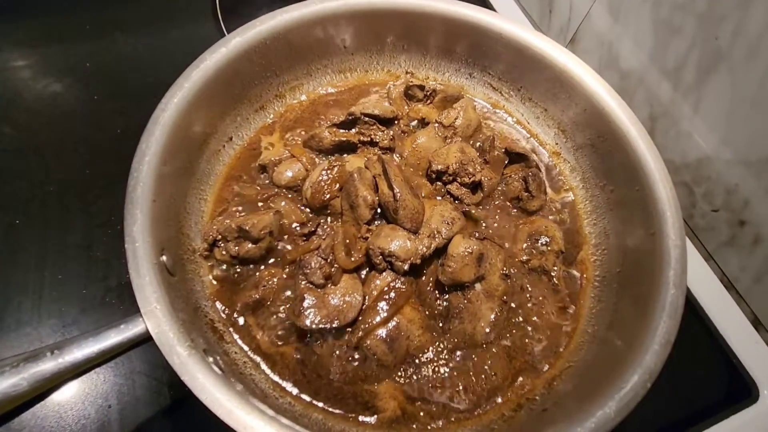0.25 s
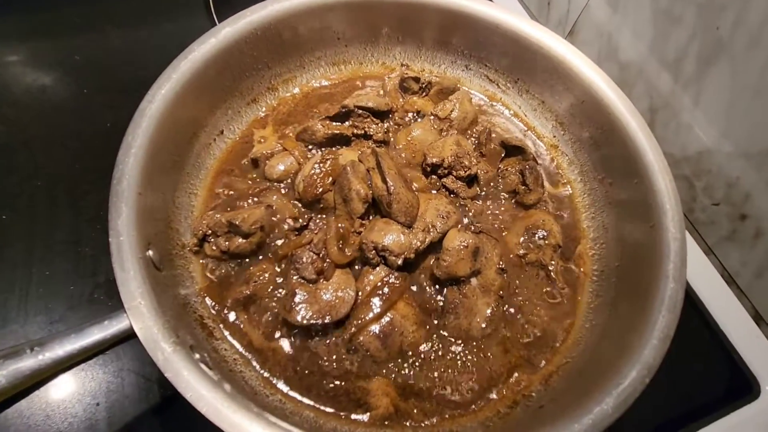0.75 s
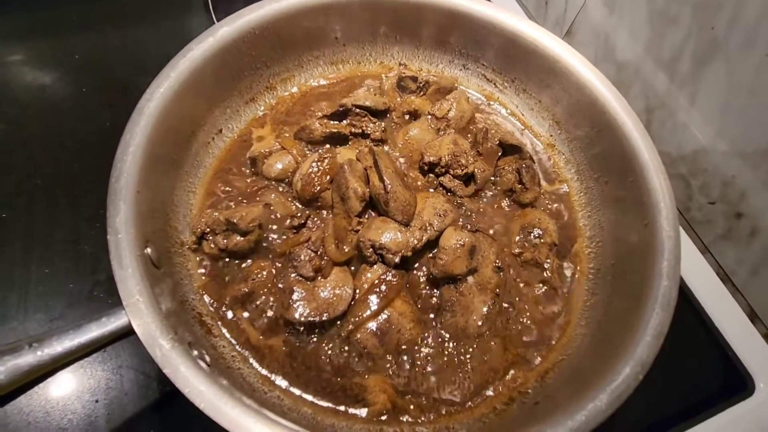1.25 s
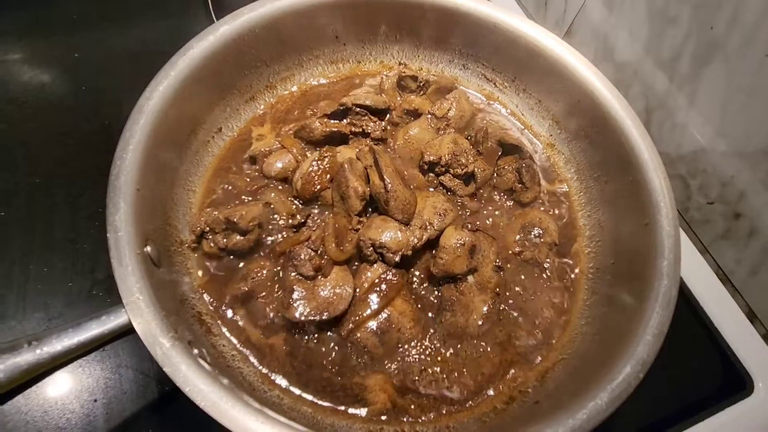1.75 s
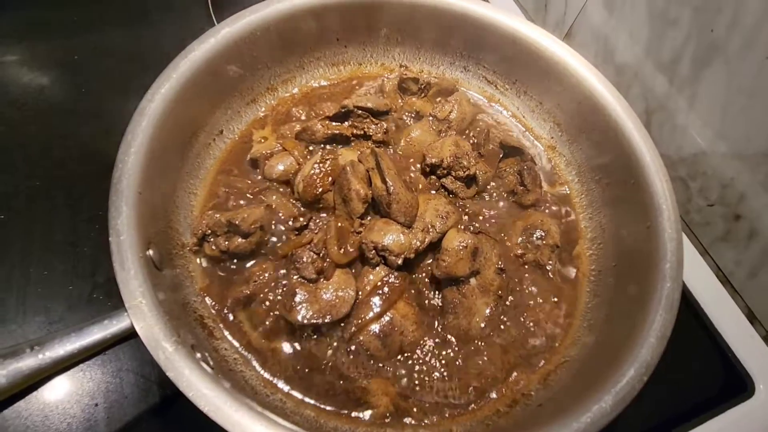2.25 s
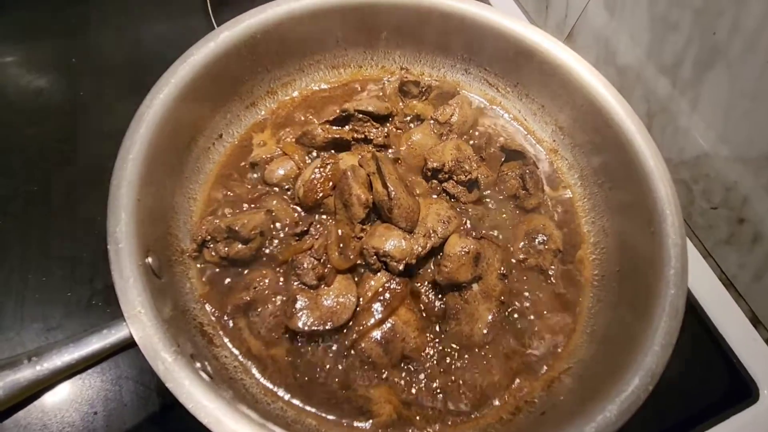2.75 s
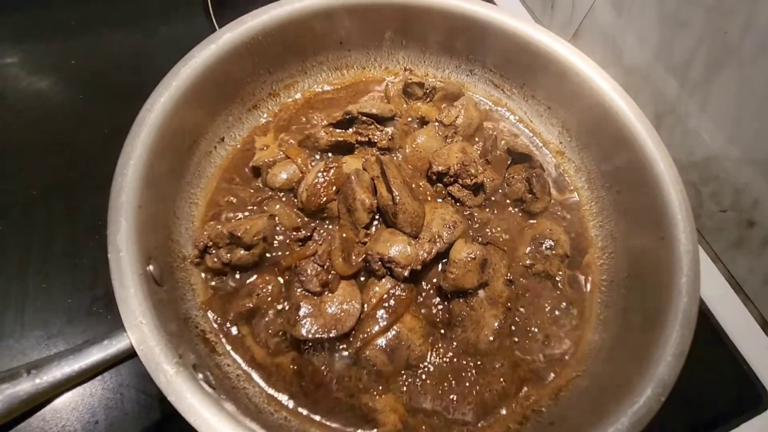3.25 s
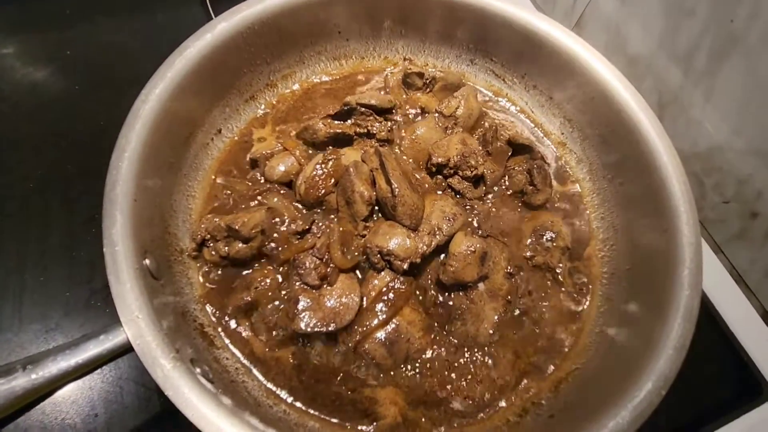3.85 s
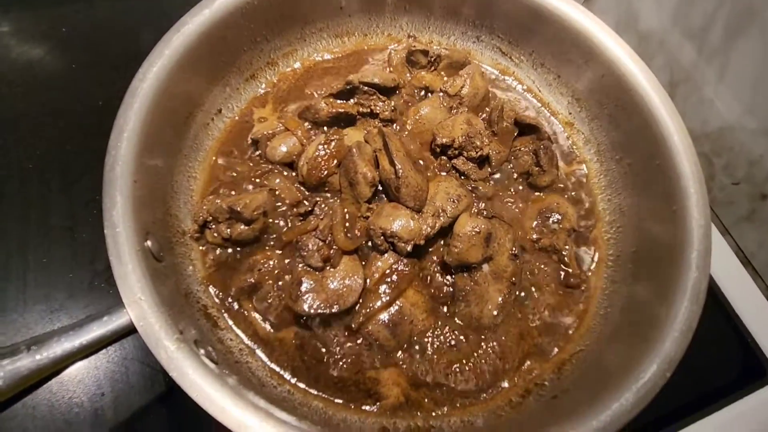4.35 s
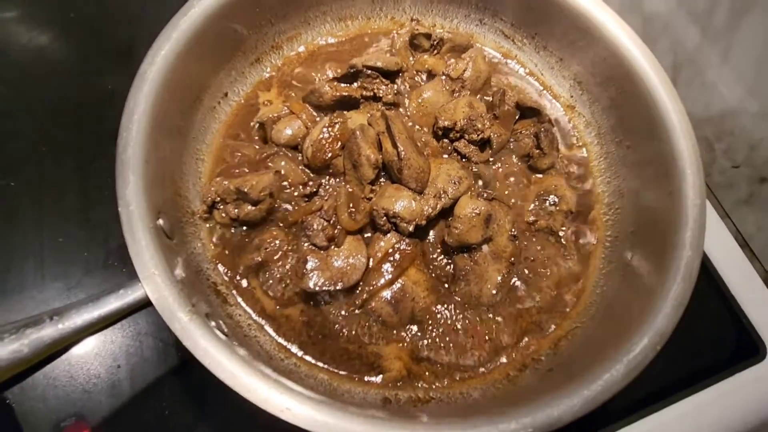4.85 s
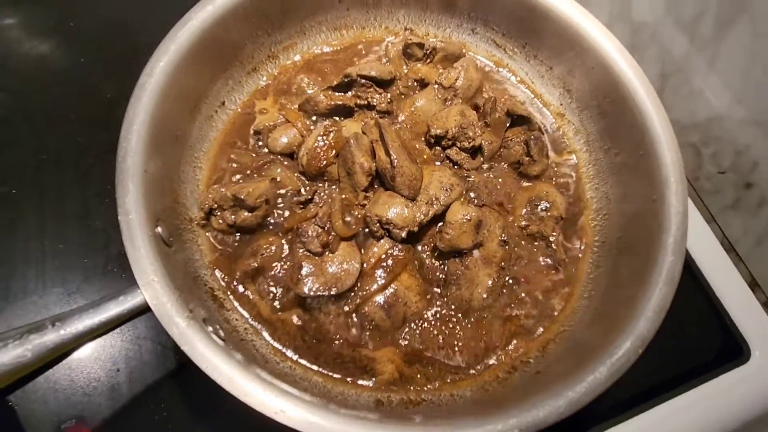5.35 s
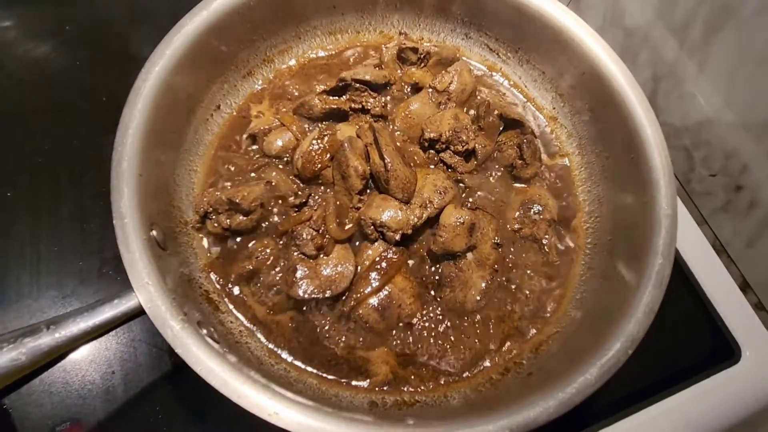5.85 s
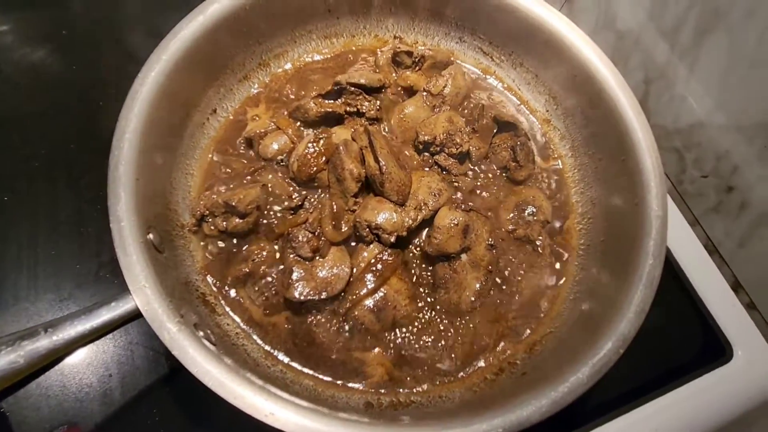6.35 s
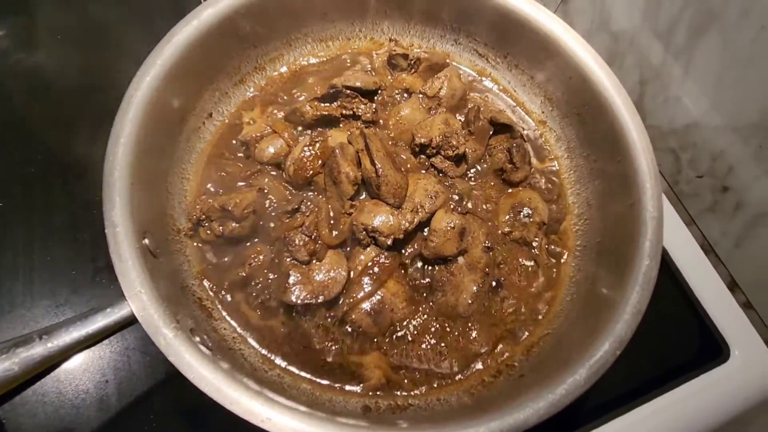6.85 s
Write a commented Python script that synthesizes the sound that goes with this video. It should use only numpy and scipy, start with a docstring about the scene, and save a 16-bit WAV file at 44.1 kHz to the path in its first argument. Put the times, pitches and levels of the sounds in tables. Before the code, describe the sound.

Close stereo sound of a simmering pan: dense, crisp, crackly fizz with a few small bright pops, over the constant low drone and airflow of a cooker hood. After a slight early puff, a sudden draught knocks against the left microphone with dull rapid thumps and rumble, dies away in stages, and leaves the steady simmer and hum, with faint gusts late on.

```python
"""Meat simmers in its sauce in a steel pan on a glass hob, under a running extractor hood.
From the start the hood hums on steady tones over the rush of air, made of shaped noise, while tiny
bubbles fizz as short puffs of noise. Larger bubbles pop now and then as brief rings, the first after 0.3 s.
After a short gust at 0.5 s, a draught buffets the left microphone port from 2.6 s: a run of low knocks
over rumbling noise that dies down to a flutter. Two weaker gusts and two pops come near the end."""
import sys
import numpy as np
from scipy import signal
from scipy.fft import rfft, irfft, next_fast_len
from scipy.io import wavfile

SR = 44100
rng = np.random.default_rng(int(sys.argv[2]) if len(sys.argv) > 2 else 0)


def digitize_waveform(pressure):
    """Quantize a signal to 16-bit integers and store it at the path in sys.argv[1].

    Rows of a 2-D input are taken as channels; values are limited to [-1, 1].
    """
    field = np.atleast_2d(pressure).T
    bounded = np.clip(field, -1, 1)
    quanta = np.round(bounded * 32767).astype(np.int16)
    wavfile.write(sys.argv[1], SR, quanta)


N = 313549  # length of the sound in samples

# bubbles by size, the smallest fizz highest:
# (lowest pitch [Hz], highest pitch [Hz], typical bursts [per s], typical rise above the weakest burst [dB])
BUBBLE_SIZES = [(1500, 5730, 2200, 3.5), (6020, 10100, 2200, 5), (9100, 19000, 1100, 4.5)]
# fizz of the sauce as the pan colours it, before it is split by bubble size:
# (frequency [Hz], left level [dB per Hz], right level [dB per Hz])
FIZZ_COLOUR = [(1500, -76, -78.5), (3430, -88, -81.5), (4340, -84, -73.5), (5500, -81.5, -76.5),
               (6860, -82, -75), (7370, -83.5, -72.5), (8470, -86.5, -76), (9170, -86, -86),
               (9900, -94, -92), (11000, -92, -94), (11900, -87, -84), (12900, -88, -88), (13900, -94, -90),
               (15200, -88, -90)]
# how alike the fizz is in the two ears: (frequency [Hz], likeness [0-1])
FIZZ_ALIKE = [(1500, 0.11), (7000, 0.01), (8000, 0.8), (15000, 1)]
# larger bubbles bursting; pops() shifts all their levels together:
# (time [s], relative level [dB], pitch [Hz], left minus right [dB])
LARGE_BUBBLES = [(.3346, -26, 7450, -10), (.5616, -34, 4500, -5), (1.2795, -24, 7350, -9),
                 (2.5895, -31, 3340, -6), (3.7105, -29, 4300, -3), (4.1335, -36, 4600, -6),
                 (6.349, -24, 8510, -10), (7.0244, -23, 7690, -6)]
# gusts of the draught at the microphone: (start [s], length of the hold [s], level before it sags [dB])
DRAUGHT_GUSTS = [(0.538, 0.11, -26), (2.597, 0.35, -10), (3.06, 0.58, -14), (3.685, 0.43, -20.5),
                 (4.43, .05, -31), (4.78, 0.47, -33), (6.363, 0.43, -27), (6.994, 0.11, -28)]
# the strongest eddies knocking on the left port, before the port filters them:
# (time [s], thump level [dB], edge level [dB], pitch of the edge [Hz])
EDDY_KNOCKS = [(2.615, 2, -10, 480), (2.632, -2, -17, 480), (2.666, -1, -12, 520), (2.722, -1, -12, 560),
               (2.760, -2, -13, 420), (2.797, 0, -13, 400), (2.829, -6, -16, 470), (2.877, -4, -26, 380),
               (2.918, -9, -26, 350), (2.952, -5, -18, 380), (3.123, -13, -14, 380), (3.161, -5, -16, 520),
               (3.347, -12, -17, 480), (3.414, -9, -10.5, 560)]
# motor and fan tones, close pairs beat: (frequency [Hz], average level [dB], left minus right [dB])
HOOD_TONES = [(94.56, -33.5, 0), (120.02, -22.2, .3), (127.3, -30.4, .6), (152.8, -42, .5),
              (214.58, -28.6, -1.1), (254.62, -25.3, -1.2), (265.5, -35.7, 1.1)]
# low roar of the fan, alike in both ears: (frequency [Hz], level [dB per Hz])
FAN_ROAR = [(25, -72), (45, -81), (62, -55.5), (78, -52.5), (105, -56), (150, -51.5), (195, -48),
            (235, -54.5), (285, -51.5), (330, -57), (390, -60.5), (440, -74.5), (560, -92)]
# air through the filter and duct, arriving from all sides:
# (frequency [Hz], left level [dB per Hz], right level [dB per Hz])
AIR_RUSH = [(70, -91, -95), (201, -65, -57), (320, -65, -67), (430, -70, -67), (507, -62.5, -63),
            (630, -73, -72.5), (706, -62, -67.5), (970, -67, -69.5), (1085, -65, -69), (1160, -71.5, -67.5),
            (1365, -64, -66.5), (1730, -74, -70), (1830, -72.5, -65), (2190, -68.5, -74),
            (2400, -77.5, -73.5), (3200, -74, -74), (4740, -86.5, -80.5), (9000, -108, -98.5)]
# narrow resonances of the duct, rung by the passing air:
# (frequency [Hz], width [Hz], left level [dB], right level [dB])
DUCT_RESONANCES = [(377.6, 29, -46.5, -41), (479.4, 14, -60, -50), (524.5, 27, -52, -49.5),
                   (752, 22, -46.5, -52), (1358, 36, -51, -55), (1844, 37, -79, -48)]

# every gust rises quickly, sags while it blows, then collapses into the faint stir of the room
GUST_ATTACK_S, GUST_SAG_DB_PER_S, GUST_RELEASE_DB_PER_S, STIR_DB = .012, 5.5, 198, -65
CUTOFF_HZ = 15800
LEFT_ONLY = np.array([[1], [0]])


def fizz(burst_s=0.00068, clump_db=1.0, own_clump_db=1.45, hiss_share=0.3, broad_share=0.47):
    """Tiny bubbles burst in clumps, each a very short puff of noise, over a smooth hiss of steam."""
    shared_clumps_db = clump_db * drift(25)
    bins_hz = np.fft.rfftfreq(next_fast_len(N), 1 / SR)
    colour = from_db(over_frequency(FIZZ_COLOUR))
    alike = np.clip(over_frequency(FIZZ_ALIKE), 0, 1)
    # some bursts are sharp enough to fill every band at once
    broad = burst_power(per_s=1200, size_db=2.5, burst_s=burst_s)
    same = different = 0
    for low_hz, high_hz, per_s, size_db in BUBBLE_SIZES:
        # the number of bursts swells and thins out, partly in step for all sizes
        clumps_db = shared_clumps_db + own_clump_db * drift(25)
        own = burst_power(per_s * from_db(2 * clumps_db), size_db, burst_s)
        bursts = rms_one(np.sqrt(own + broad_share * broad + hiss_share))
        low_edge = 1 + (low_hz / (bins_hz + 1)) ** 16
        high_edge = 1 + (bins_hz / high_hz) ** 16
        gains = colour / np.sqrt(low_edge * high_edge)
        # the lower fizz differs between the ears; most of the top is the same in both
        same = same + filtered(bursts * white(), gains * np.sqrt(alike))
        two_noises = np.array([white(), white()])
        different = different + filtered(bursts * two_noises, gains * np.sqrt(1 - alike))
    return same + hob_corner(different, echo_gain=0.13)


def pops(cycles=7, gain_db=-2):
    """A larger bubble rings for a few cycles as its skin breaks."""
    out = np.zeros((2, N))
    t = np.arange(SR // 100) / SR
    for time_s, level_db, hz, pan_db in LARGE_BUBBLES:
        at = round(time_s * SR)
        ring = np.sin(2 * np.pi * hz * t) * np.exp(-hz * t / cycles)
        out[:, at:at + len(t)] += from_db(level_db + gain_db) * panned(pan_db) * ring
    return out


def knocks(body_hz=140):
    """A single eddy pushes and pulls once on the left port: a dull thump with a sharper edge."""
    t = np.arange(-SR // 50, SR // 50) / SR
    pressure = np.zeros(N)
    for time_s, thump_db, edge_db, edge_hz in EDDY_KNOCKS:
        thump = push_and_pull(t, body_hz)
        edge = push_and_pull(t, edge_hz)
        at = round(time_s * SR) - len(t) // 2
        pressure[at:at + len(t)] += from_db(thump_db) * thump + from_db(edge_db) * edge
    # the port lets little of the slowest part through
    return LEFT_ONLY * band(pressure, 80, 1500)


def push_and_pull(t, hz):
    """One swing of pressure up and down, peaking at 1; a higher pitch makes it shorter."""
    u = 2 * np.pi * hz * t
    return -u * np.exp((1 - u * u) / 2)


def draught(rumble_db=-3, churn_db=-3, rasp_db=-16.0, full_db=-11, flutter_db=-17, flutter_pan_db=4,
            flutter_growth=-0.71, churn_growth=0.86, rasp_growth=1.6, lumpy_db=3):
    """Turbulence at the left port: stronger air sheds smaller, higher eddies; slow flutter moves both ports."""
    level_db = gust_level()
    force_db = level_db - full_db
    lumps = from_db(lumpy_db * drift(45))
    # each growth is the extra dB of a layer for each dB of force
    flutter = from_db(flutter_db + flutter_growth * force_db) * rms_one(band(white(), 42, 90))
    rumble = from_db(rumble_db) * rms_one(band(white(), 73, 144.5))
    churn = from_db(churn_db + churn_growth * force_db) * rms_one(band(white(), 132, 294, order=3))
    rasp_noise = rms_one(band(lumps * white(), 260, 640, order=3))
    rasp = from_db(rasp_db + rasp_growth * force_db) * rasp_noise
    both_ports = panned(flutter_pan_db) * flutter
    return from_db(level_db) * (both_ports + LEFT_ONLY * (rumble + churn + rasp))


def gust_level():
    """Strength of the draught in dB: each gust has an attack, a sagging hold and a release."""
    t = np.arange(N) / SR
    strength = from_db(STIR_DB)
    for start_s, length_s, level_db in DRAUGHT_GUSTS:
        age = np.maximum(t - start_s, 0)
        fall_db = GUST_SAG_DB_PER_S * age + GUST_RELEASE_DB_PER_S * np.maximum(age - length_s, 0)
        attack = np.minimum(age / GUST_ATTACK_S, 1)
        strength = strength + attack * from_db(level_db - fall_db)
    return 20 * np.log10(strength)


def hum(waver_db=.5, wander_rad=0.057):
    """Steady tones of motor and blades; the uneven airflow sways each a little in level and phase."""
    t, out = np.arange(N) / SR, 0
    for hz, level_db, pan_db in HOOD_TONES:
        phase = 2 * np.pi * (hz * t + rng.random()) + wander_rad * drift(0.62)
        tone = np.sqrt(2) * np.sin(phase)
        out = out + tone * from_db(level_db + waver_db * drift(1.7)) * panned(pan_db)
    return out


def airflow():
    """Long waves of the roar reach both ears as one; the duct's rush reaches each by its own paths."""
    roar = filtered(white(), from_db(over_frequency(FAN_ROAR)))
    rush = filtered(np.array([white(), white()]), from_db(over_frequency(AIR_RUSH)))
    duct = 0
    for hz, width_hz, left_db, right_db in DUCT_RESONANCES:
        ringing = rms_one(resonance(white(), hz, width_hz))
        duct = duct + from_db([[left_db], [right_db]]) * ringing
    return roar + hob_corner(rush) + duct


def hob_corner(x, echo_gain=.17, count=8):
    """Hob, wall and hood return early echoes, at other delays for each ear, which ripple the spectrum."""
    out = x.copy()
    delays = (rng.uniform(.002, .016, (2, count)) * SR).astype(int)  # drawn in s, turned into samples
    for ear, lags in enumerate(delays):
        for lag in lags:
            out[ear, lag:] += echo_gain * x[ear, :-lag]
    # keep the overall strength about the same
    return out / np.sqrt(1 + count * echo_gain ** 2)


def burst_power(per_s, size_db, burst_s):
    """Power of bubbles that burst at random, each dying away at once; mean 1."""
    born = rng.random(N) < per_s / SR
    sizes = from_db(size_db * np.minimum(rng.exponential(1, N), 5))
    power = signal.lfilter([1], [1, -np.exp(-1 / (burst_s * SR))], born * sizes ** 2)
    return power / power.mean()


def resonance(x, hz, width_hz):
    """Two-pole resonance with a gain of 1 on top."""
    r = np.exp(-np.pi * width_hz / SR)
    feed = np.array([1, 0, -1]) * (1 - r * r) / 2
    return signal.lfilter(feed, [1, -2 * r * np.cos(2 * np.pi * hz / SR), r * r], x)


def drift(rate_hz):
    """Slow chance with a spread of 1: noise at every 40th sample through a double one-pole low-pass."""
    r = np.exp(-80 * np.pi * rate_hz / SR)
    chance = rng.standard_normal(N // 40 + 4002)
    # the first 4000 points only let the filter settle
    slow = signal.lfilter([1], [1, -2 * r, r * r], chance)[4000:]
    return np.interp(np.arange(N) / 40, np.arange(len(slow)), rms_one(slow))


def white():
    """White noise of 0 dB per Hz."""
    return rng.standard_normal(N) * np.sqrt(SR / 2)


def band(x, low_hz, high_hz, order=2):
    """Butterworth band-pass: keeps mainly what lies between two frequencies."""
    sos = signal.butter(order, [low_hz, high_hz], "band", fs=SR, output="sos")
    return signal.sosfilt(sos, x + 1e-18)


def over_frequency(table):
    """The columns of a table at every Fourier bin, joined on a log-frequency axis."""
    hz, *columns = np.transpose(table)
    bins_hz = np.fft.rfftfreq(next_fast_len(N), 1 / SR)
    log_bins = np.log(np.maximum(bins_hz, 1))
    return np.array([np.interp(log_bins, np.log(hz), column) for column in columns])


def filtered(x, gains):
    """Applies one gain per Fourier bin."""
    size = next_fast_len(N)
    return irfft(rfft(x, size) * gains, size)[..., :N]


def panned(pan_db):
    """Left and right gains for a level difference."""
    return from_db(np.array([[pan_db], [-pan_db]]) / 2)


def rms_one(x):
    """The same signal with an rms (average strength) of 1."""
    return x / np.sqrt(np.mean(x ** 2) + 1e-20)


def from_db(db):
    """Decibels to gain."""
    return 10 ** (np.asarray(db) / 20)


def scene():
    """Pan and hood in both ears, the draught mostly in the left."""
    return fizz() + pops() + knocks() + draught() + hum() + airflow()


def record(dry, ceiling=1.0):
    """The strongest peaks are rounded off, and the top is cut."""
    rounded = dry / (1 + (dry / ceiling) ** 6) ** (1 / 6)
    return signal.sosfilt(signal.ellip(12, .1, 90, CUTOFF_HZ, fs=SR, output="sos"), rounded)


dry = scene()
out = record(dry)
digitize_waveform(out)
```